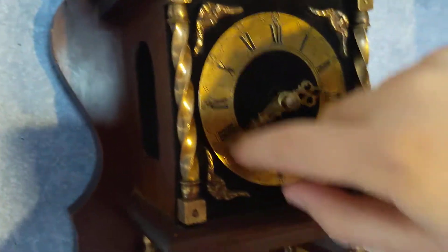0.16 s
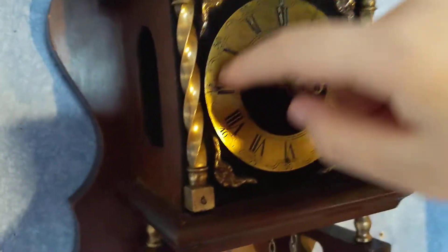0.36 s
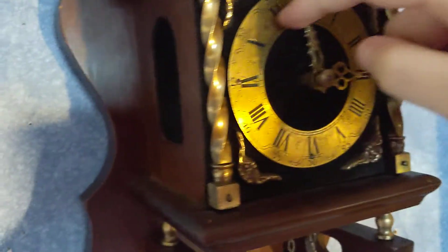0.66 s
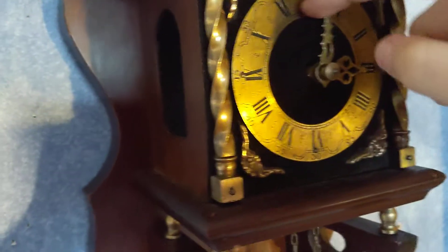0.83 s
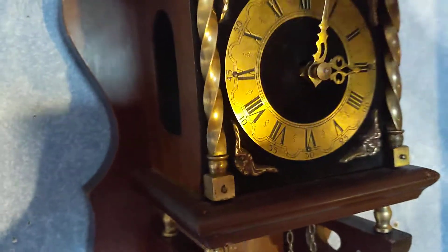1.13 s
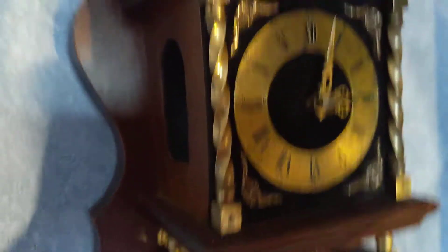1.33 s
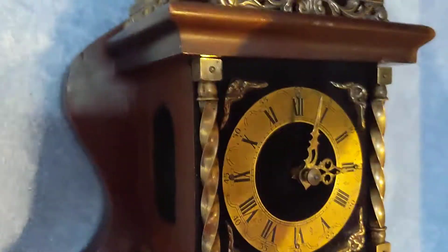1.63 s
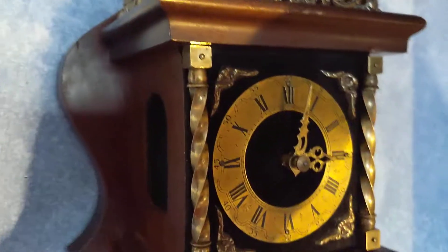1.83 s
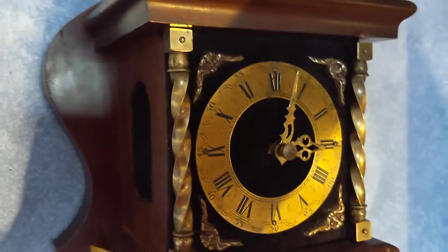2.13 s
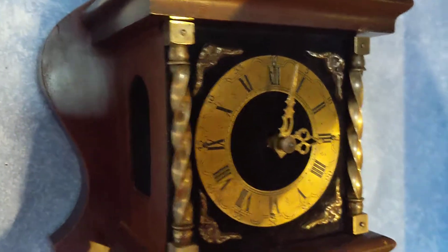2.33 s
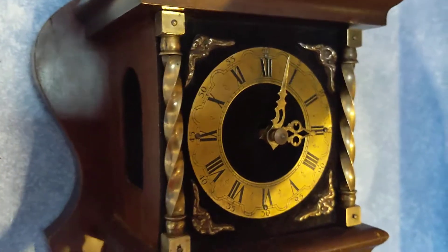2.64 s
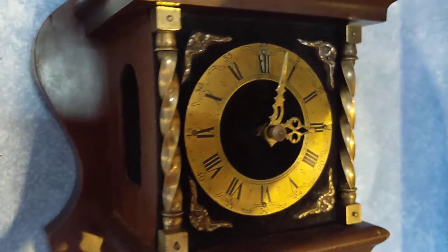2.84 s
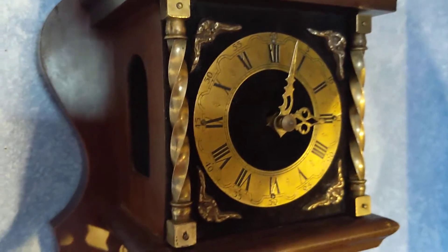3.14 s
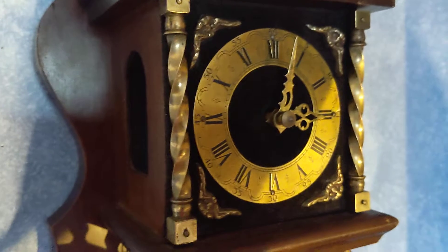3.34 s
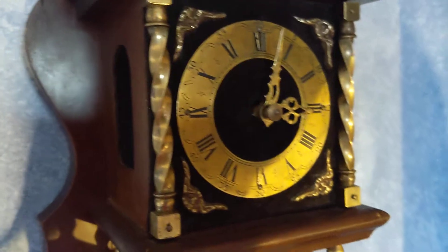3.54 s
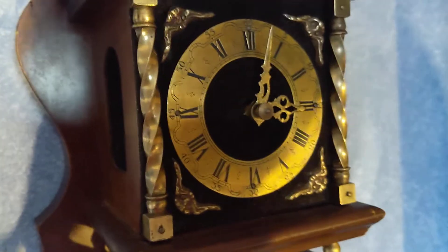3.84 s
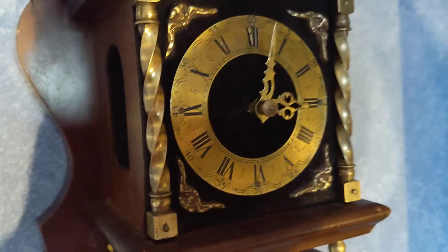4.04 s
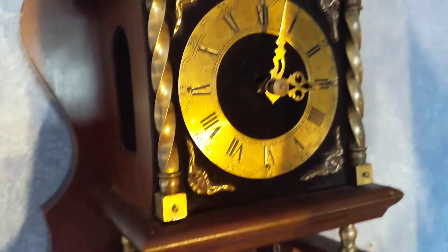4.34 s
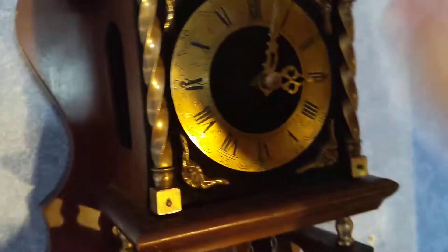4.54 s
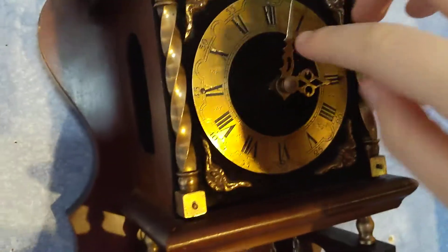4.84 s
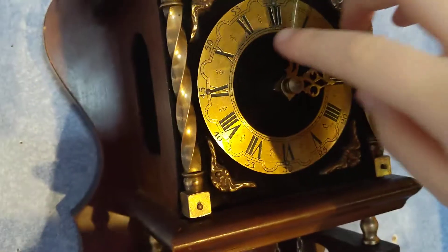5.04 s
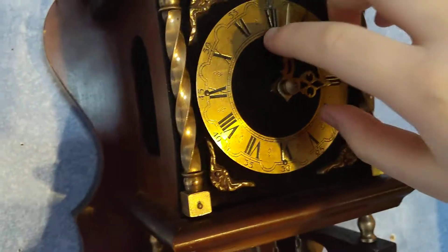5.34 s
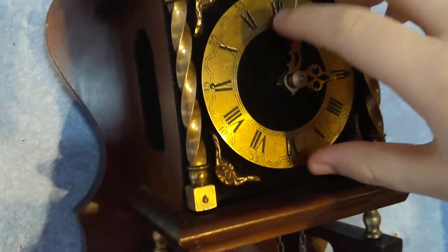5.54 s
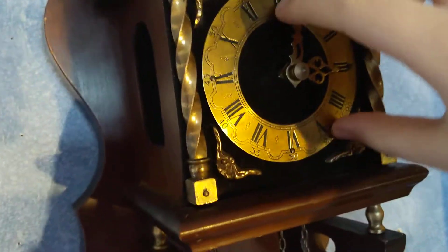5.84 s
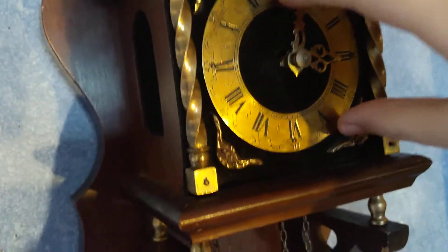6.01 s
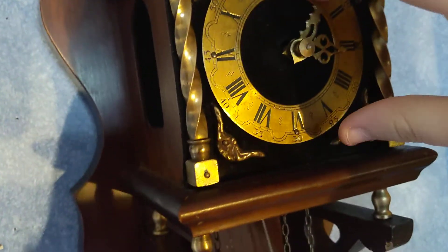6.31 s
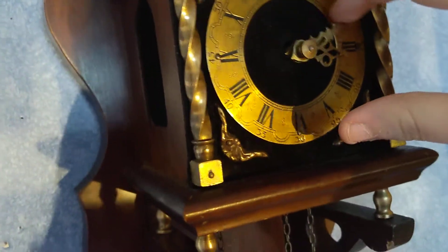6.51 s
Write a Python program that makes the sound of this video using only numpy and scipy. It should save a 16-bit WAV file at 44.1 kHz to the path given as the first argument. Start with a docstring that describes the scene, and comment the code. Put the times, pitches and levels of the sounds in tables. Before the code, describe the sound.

Close to a hand-held microphone, fingers brush softly over a wall clock's dial and a lever lets go with a bright snap. Three thin, high strokes of a small brass bell follow at slightly uneven intervals, each with a metallic clatter inside the wooden case. The last ring fades, leaving faint, limping ticks, more light rubbing and a second clock beating evenly across the quiet room.

```python
"""In a quiet room a weight-driven wall clock ticks faintly, its small brass bell still ringing out.
A second clock beats across the room, and fingers rub the dial as they push the hand round.
A lever snaps off its pin, the strike train is released, and the hammer hits the bell three times.
After each blow the hammer bounces back and the train rattles in the wooden case. The ring dies
away into ticking, finger rubs and the soft rumble of the close, hand-held microphone."""
import sys
import numpy as np
from scipy import signal
from scipy.fft import rfft, irfft, next_fast_len
from scipy.io import wavfile
from scipy.ndimage import map_coordinates

SR = 44100
rng = np.random.default_rng(int(sys.argv[2]) if len(sys.argv) > 2 else 0)


def generate_wav(sig):
    """Save sig (samples, or channels by samples) to the path in sys.argv[1] as 16-bit PCM at SR."""
    pcm = np.round(np.clip(np.atleast_2d(sig).T, -1, 1) * 32767).astype(np.int16)
    wavfile.write(sys.argv[1], SR, pcm)


N = 294383
TIME = np.arange(N) / SR

# Tone colours of the noise layers. Each row: frequency in Hz, level in dB.
AIR_COLOUR = [(18, -12.5), (30, -4), (59, -2.5), (252, -16.5), (526, -12), (760, -17), (1630, -21.5),
              (1910, -24.5), (3490, -17), (4910, -25), (5740, -14), (6720, -29.5), (14800, -27.5),
              (16000, -41)]
HANDLING_COLOUR = [(15, -22), (38, 8), (60, -13.5), (130, -10.5), (250, -28.5), (600, -51.5)]
RUB_COLOUR = [(100, -7), (400, -12), (650, -3), (1200, 1.5), (1900, 1.5), (3200, 4), (5500, -3),
              (9000, -12), (16000, -22.5)]
TOCK_COLOUR = [(100, -5), (200, 7.5), (330, -18), (750, 4), (1100, -4), (1800, -4), (2350, 3), (3700, -0.5),
               (5000, -8.5), (9000, -15), (16000, -28)]
TICK_COLOUR = [(100, -12), (400, -8), (800, 0), (1400, -12), (3500, 6.5), (7000, -3), (12000, -1),
               (16000, -9)]
SLIP_COLOUR = [(60, -18), (210, 11.5), (330, -14.5), (800, 7.5), (1400, -6), (3300, -0.5), (5700, 0),
               (8000, -10), (15000, -14)]
SNAP_COLOUR = [(60, -20), (200, 9.5), (350, -14), (800, 9), (1300, -3.5), (3500, 2), (8500, -6), (10200, 4),
               (13000, -6), (14300, 14), (16000, -11)]
SIZZLE_COLOUR = [(9000, -58.5), (14900, -27.5), (15350, -4), (15550, 1.5), (15750, -9.5), (16100, -39)]
CLATTER_COLOUR = [(60, -21), (150, -3.5), (400, -4), (520, -12), (850, .5), (1400, -13), (2000, -11.5),
                  (3500, 0), (4300, -6.5), (5500, 3.5), (6700, -8), (8400, -10), (10500, 1), (15800, -2.5)]

# Body resonances of the parts. Each row: pitch in Hz, level in dB, 60 dB decay time in seconds.
RUB_MODES = [(610, -19, .3), (785, -11.5, 0.21), (1128, -10.5, .2), (1530, -10, 0.22), (3470, -7, .2)]
TOCK_MODES = [(488.6, -1, 0.24)]
TICK_MODES = [(657, 4.5, .25), (900, 3, 0.192)]
SLIP_MODES = [(654, 4, 0.156), (690, 2.5, .12), (1930, -9, 0.12), (2395, -7, 0.086), (3280, -6, .1),
              (7950, -12, .1)]
SNAP_MODES = [(664, -6.5, 0.15), (920, -10.5, 0.083), (1674, -13, 0.077), (5490, 10.5, 0.08),
              (7610, 3.5, 0.054), (10160, 0, 0.14), (11850, 6.5, 0.076), (14230, 9, 0.051)]
CASE_MODES = [(145.1, -20.5, 0.58), (215, -17, 0.31), (301.6, -18, 0.32), (633, -20.5, 0.45),
              (690, -10, 0.19), (790, -14, .2), (935, -7.5, 0.2), (3370, -18.5, 0.293), (5471, -15, 0.18),
              (9523, -16.5, 0.256), (11650, -17, 0.2), (14450, -19, .25)]

# Shifts of grip. Each row: peak time in seconds, half length in seconds, level in dB.
GRIP_SHIFTS = [(1.05, .15, -59.5), (1.48, .2, -64), (2.25, .25, -64), (3.28, .1, -63), (4.1, .1, -65),
               (5.95, .06, -54.5), (6.15, .06, -55)]
# Finger strokes. Each row: start in seconds, level in dB, 60 dB decay time in seconds.
RUBS = [(.10, -57, .4), (.335, -57.5, .41), (.55, -55, .35), (1.0, -57, .62), (1.62, -60, .6),
        (3.015, -52, .21), (4.51, -54, .3), (5.0, -52.5, .28), (5.17, -53.5, .18), (5.366, -47, .17),
        (5.65, -57.5, .35), (5.9, -60, .35), (6.145, -57, .36), (6.48, -58, .5), (6.64, -56, .5)]
# Clicks of the gears behind the hands. Each row: start in seconds, level in dB.
CLICKS = [(.703, -48), (2.102, -53), (5.913, -61)]
# Escapement beats, lever slips and hammer bounces.
# Each row: start in seconds, level in dB, crack in dB relative to that level.
TICKS = [(.082, -63, 0), (.468, -59, -7), (.863, -63, -3), (1.350, -57.5, -5), (1.867, -62.5, 0),
         (2.127, -63, 8), (3.133, -56.5, 3), (3.642, -58.5, 4), (4.91, -59, -6), (5.42, -62.5, -4),
         (5.803, -59.5, -10), (6.315, -64, -8)]
SLIPS = [(1.977, -53, -7), (1.992, -51, -14), (3.107, -58, -7), (3.17, -57, 0), (3.906, -42.5, -8),
         (3.922, -41, -10), (3.963, -43, -7), (3.969, -42.5, 16.5), (3.997, -40.5, -7), (4.022, -42, 11),
         (4.06, -40, 3), (4.097, -42, -3)]
BOUNCES = [(2.306, -32, 10), (2.405, -43, -14), (3.313, -40, 2), (3.345, -37, 3), (4.174, -36, -7),
           (4.21, -38.5, -8), (4.265, -44, -2)]
# The lever's double hit. Each row: start in seconds, level in dB, 60 dB decay time in seconds,
# relative crack in dB.
SNAP_HITS = [(.899, -36, 0.19, 7), (.9035, -37.5, 0.054, 0)]

# The bell's voice. Each row: pitch in Hz, level in dB, 60 dB decay time in seconds,
# right side relative to left in dB, phase lead of the left side in radians.
BELL_PARTIALS = [(1071, -48, 1.1, -11, 0.46), (2739, -35.7, 2.4, -29, 2.5), (4864.5, -29.3, 3.0, -18, 2.1),
                 (7398, -26.2, 3.04, -16.5, 0.8), (10326, -25.2, 1.75, -12, 1.5),
                 (13652, -19.8, 0.5, -1.5, .85)]
# Hammer blows; the first falls before the start, so only its tail is heard. Each row: start in seconds,
# strength in dB, pitch the contact point favours in Hz, pitch it slights in Hz,
# free ringing in seconds, edge in Hz below which the ring then fades early.
STRIKES = [(-1.8, 3, 6200, 2700, 2.6, 5200), (2.2045, -.5, 7400, 3900, .47, 5350),
           (3.2345, .5, 11800, 7400, .41, 5200), (4.050, -4, 6200, 3400, .35, 6600)]
# The high ring drops suddenly. Each row: start in seconds, centre in Hz, loss in dB.
RING_DROPS = [(2.37, 9000, 7), (3.35, 9050, 28), (4.17, 8500, 8.5), (4.47, 8700, 8.5)]

STEEL_RISE_S = .00012   # attack of steel on metal


def from_db(db):
    """Decibels to gain."""
    return np.exp(np.asarray(db) * (np.log(10) / 20))


def bump(distance, width):
    """A rounded weight: 1 at distance 0."""
    return np.exp(-(distance / width) ** 2)


def drift(rate, size):
    """A smooth random wobble of spread about 1 that changes `rate` times a second."""
    knots = rng.standard_normal(512)
    coarse = np.arange(0, size + 32, 32)
    wobble = map_coordinates(knots, [coarse * rate / SR], mode="wrap")
    return np.interp(TIME[:size], coarse / SR, wobble)


def echoes(rate, size):
    """Reflections of a tone add up with wandering strength and phase."""
    return (drift(rate, size) + 1j * drift(rate, size)) / np.sqrt(2)


def stereo_noise(colour, alike, size):
    """Coloured noise of rms 1; `alike` is the share of power common to both sides."""
    hz, db = np.transpose(colour)
    padded = next_fast_len(size, True)
    bins = np.maximum(np.fft.rfftfreq(padded, 1 / SR), 1)
    eq = from_db(np.interp(np.log(bins), np.log(hz), db))
    noise = irfft(rfft(rng.standard_normal((3, padded))) * eq, padded)[:, :size]
    noise /= noise.std()
    return np.sqrt(alike) * noise[0] + np.sqrt(1 - alike) * noise[1:]


def add(out, s, sound):
    """Mix a sound in at s seconds."""
    at = max(int(s * SR), 0)
    out[:, at:at + sound.shape[-1]] += sound[:, :N - at]


def knocks(events, colour, modes, right_db, alike, rattle_db, rise_s, rattle_rate=400,
           crack_s=.0016, blur_rate=60, echo_s=.025, dull_hz=6000, treble_t60=.88):
    """Each contact is a crack, a rattling wash that dies away, and the part's modes blurred by echoes.
    Each event: start in seconds, level in dB, 60 dB decay time in seconds, relative crack in dB."""
    out, size = np.zeros((2, N)), 2 ** 14
    age = TIME[:size]
    wet = 1.2 * (1 - np.exp(-age / echo_s))   # the direct sound comes first, echoes build up
    rings = [from_db(db - 60 * age / t60) * np.exp(2j * np.pi * hz * age) / np.hypot(1, wet)
             for hz, db, t60 in modes]
    washes = stereo_noise(colour, alike, size * len(events))
    lows = signal.sosfiltfilt(signal.butter(2, dull_hz, fs=SR, output="sos"), washes)
    for k, (s, db, t60, crack_db) in enumerate(events):
        rattle = from_db(rattle_db * drift(rattle_rate, size))
        tail = rattle / np.sqrt(np.mean(rattle ** 2)) * from_db(-60 * age / t60)
        crack = from_db(crack_db) * np.exp(-age / crack_s)
        span = slice(k * size, (k + 1) * size)
        treble = (washes[:, span] - lows[:, span]) * from_db(-60 * age / treble_t60)   # absorbed first
        sound = (crack + tail) * (lows[:, span] + treble)
        for ring in rings:
            phase = np.exp(2j * np.pi * rng.random())
            sound += np.imag(ring * phase * (1 + wet * echoes(blur_rate, size)))
        add(out, s, from_db(db) * sound * (1 - np.exp(-age / rise_s)))
    return out * from_db([[0], [right_db]])


def room_air(level_db=-67.5):
    """A bed of still air, leaning a little to the left."""
    return from_db(level_db) * stereo_noise(AIR_COLOUR, .25, N) * from_db([[1.5], [-1.5]])


def handling(rest_db=-73, waver_db=1.5):
    """The hand holding the microphone rumbles faintly and swells at each shift of grip."""
    swells = sum(from_db(db) * bump(TIME - s, half_s) for s, half_s, db in GRIP_SHIFTS)
    waver = from_db(waver_db * drift(5, N))
    return (from_db(rest_db) + swells) * waver * stereo_noise(HANDLING_COLOUR, .82, N)


def rustle(count=70, level_db=-68.5, spread_db=3, low_hz=600, high_hz=4600, swell_s=.014, right_db=-10):
    """Faint scuffs come at random, each a short swell at a pitch of its own."""
    out, age = np.zeros((2, N)), TIME[:SR // 6]
    swell = age / swell_s * np.exp(1 - age / swell_s)
    for when, pitch, strength in rng.random((count, 3)):
        hz = low_hz * (high_hz / low_hz) ** pitch
        band = signal.butter(2, [hz / 1.12, hz * 1.12], "band", fs=SR, output="sos")
        scuff = signal.sosfilt(band, rng.standard_normal((2, len(age))))
        add(out, when * N / SR, from_db(level_db + spread_db * strength) * swell * scuff / scuff.std())
    return out * from_db([[0], [right_db]])


def finger_rubs(touch_db=-8):
    """Fingertips brush over hand and dial with a soft attack."""
    strokes = [(s, db, t60, touch_db) for s, db, t60 in RUBS]
    return knocks(strokes, RUB_COLOUR, RUB_MODES, right_db=-15, alike=.372, rattle_db=2.5,
                  rise_s=.007, rattle_rate=150)


def far_clock(start_s=.234, period_s=.8706, level_db=-53.5, t60=.22, crack_db=2):
    """A second pendulum clock beats evenly across the room."""
    beats = [(s, level_db, t60, crack_db) for s in np.arange(start_s, N / SR, period_s)]
    return knocks(beats, TOCK_COLOUR, TOCK_MODES, right_db=-11, alike=.5, rattle_db=2.5, rise_s=.001)


def gear_clicks(t60=.02):
    """The motion work behind the hands gives tiny dry clicks."""
    clicks = [(s, db, t60, 0) for s, db in CLICKS]
    return knocks(clicks, CLATTER_COLOUR, [], right_db=-10, alike=.4, rattle_db=2, rise_s=STEEL_RISE_S)


def escapement(t60=.33):
    """The wall clock's tick limps while its hand is pushed."""
    ticks = [(s, db, t60, crack_db) for s, db, crack_db in TICKS]
    return knocks(ticks, TICK_COLOUR, TICK_MODES, right_db=-14.5, alike=.5, rattle_db=3, rise_s=.00088)


def lever_slips(t60=.12):
    """Levers slip and knock as the strike train is released."""
    slips = [(s, db, t60, crack_db) for s, db, crack_db in SLIPS]
    return knocks(slips, SLIP_COLOUR, SLIP_MODES, right_db=-11, alike=.308, rattle_db=4, rise_s=.0013)


def lever_snap():
    """The lifting lever drops off its pin with a bright snap."""
    return knocks(SNAP_HITS, SNAP_COLOUR, SNAP_MODES, right_db=-10.5, alike=.4, rattle_db=3,
                  rise_s=.00077)


def hammer_contacts(blow_db=-25.7, blow_t60=.28, blow_crack_db=11.5, bounce_t60=.35):
    """Blows and bounces as knock events; a harder blow adds a little body and more crack."""
    blows = [(s, blow_db + .3 * db, blow_t60, blow_crack_db + db) for s, db, *_ in STRIKES if s > 0]
    return blows + [(s, db, bounce_t60, crack_db) for s, db, crack_db in BOUNCES]


def high_sizzle(trim_db=-5):
    """A narrow, very high sizzle near 15.5 kHz sounds at every blow and bounce."""
    return from_db(trim_db) * knocks(hammer_contacts(), SIZZLE_COLOUR, [], right_db=-8, alike=.32,
                                     rattle_db=4, rise_s=.002)


def train_clatter():
    """Every blow and bounce shakes the hammer and strike train in the wooden case."""
    return knocks(hammer_contacts(), CLATTER_COLOUR, CASE_MODES, right_db=-9, alike=.16, rattle_db=2,
                  rise_s=STEEL_RISE_S, rattle_rate=250)


def bounce_kick(hz, since_s, lift_db_per_hz=1.6 / 7400, kick_rad=1.11, spread_rad=.37, kick_s=.015):
    """A bounce feeds a partial, the high ones most, and knocks its phase out of step."""
    angle = rng.choice([-1, 1]) * kick_rad + spread_rad * rng.standard_normal()
    kick = from_db(lift_db_per_hz * hz) * np.exp(1j * angle)
    return 1 + (kick - 1) * np.clip(since_s / kick_s, 0, 1)


def partial_swing(hz, level_db, t60, attack_s=.0016, favour_db=6, favour_octaves=.35,
                  fade_db_per_s=125, fade_width_hz=1500, drop_s=.09, drop_octaves=.45):
    """A partial's complex envelope: each blow starts it afresh, and the high partials dip soon after."""
    swing = np.zeros(N, complex)
    ends = [s for s, *_ in STRIKES[1:]] + [N / SR]
    for (s, db, favoured_hz, slighted_hz, free_s, edge_hz), end in zip(STRIKES, ends):
        span = slice(max(int(s * SR), 0), int(end * SR))
        t = TIME[span]
        age = np.maximum(t - s, 0)
        favoured = bump(np.log2(hz / favoured_hz), favour_octaves)
        slighted = bump(np.log2(hz / slighted_hz), favour_octaves)
        ring_db = level_db + db + favour_db * (favoured - slighted) - 60 * age / t60
        fade_share = np.clip((edge_hz - hz) / fade_width_hz, 0, 1)   # low partials leave early
        ring_db -= fade_db_per_s * fade_share * np.maximum(age - free_s, 0)
        for when, centre_hz, loss_db in RING_DROPS:
            if s < when < end:
                nearness = bump(np.log2(hz / centre_hz), drop_octaves)
                ring_db -= loss_db * nearness * np.clip((t - when) / drop_s, 0, 1)
        ring = from_db(ring_db) * (1 - np.exp(-age / attack_s)) * np.exp(2j * np.pi * rng.random())
        for when, *_ in BOUNCES:
            if s < when < end:
                ring *= bounce_kick(hz, t - when)
        swing[span] = ring
    return swing


def bell(flutter=.5, flutter_rate=40, echo_s=.1, sway_db=1.5, sway_hz=7400, right_sway_db=3,
         right_sway_rad=.55, sway_rate=4):
    """Six pure partials flutter with fresh echoes and sway as the microphone crosses standing waves."""
    fresh = np.zeros(N)
    for s, *_ in hammer_contacts():
        fresh = np.maximum(fresh, np.exp(-np.abs(TIME - s) / echo_s) * (TIME > s))
    out = np.zeros((2, N))
    for hz, level_db, t60, right_db, lead in BELL_PARTIALS:
        tone = np.sqrt(2) * partial_swing(hz, level_db, t60) * np.exp(2j * np.pi * hz * TIME)
        left = from_db(sway_db * min(hz / sway_hz, 1) * drift(sway_rate, N))   # long waves sway less
        # the right port faces away and hears mostly reflections, so it sways more
        right_gain = from_db(right_db + right_sway_db * drift(sway_rate, N))
        right = right_gain * np.exp(-1j * (lead + right_sway_rad * drift(sway_rate, N)))
        for side, path in enumerate([left, right]):
            out[side] += np.imag(tone * path * (1 + flutter * fresh * echoes(flutter_rate, N)))
    return out


def scene():
    """The strike up front, the small works under it, the room behind."""
    strike = bell() + train_clatter() + high_sizzle()
    works = lever_snap() + lever_slips() + escapement() + gear_clicks()
    background = far_clock() + finger_rubs() + room_air() + rustle() + handling()
    return strike + works + background


def record(dry, apart_hz=200, cutoff_hz=15950):
    """Long waves reach both microphone ports alike; the top is cut steeply."""
    mid, side = (dry[0] + dry[1]) / 2, (dry[0] - dry[1]) / 2
    side = signal.sosfilt(signal.butter(1, apart_hz, "high", fs=SR, output="sos"), side)
    top_cut = signal.ellip(10, .1, 80, cutoff_hz, fs=SR, output="sos")
    return signal.sosfilt(top_cut, [mid + side, mid - side])


dry = scene()
out = record(dry)
generate_wav(out)
```